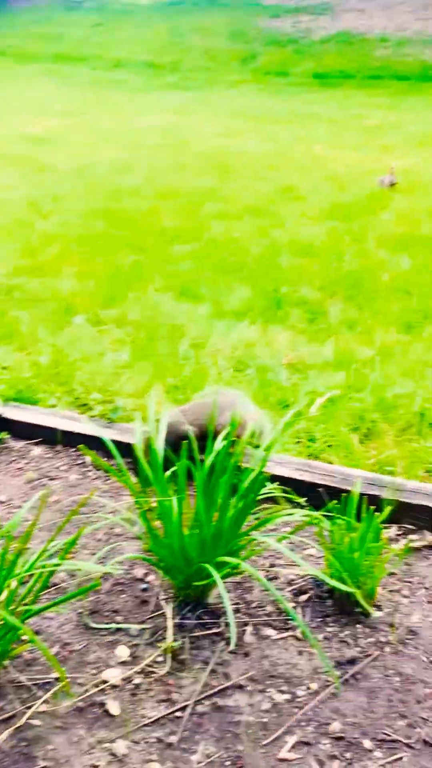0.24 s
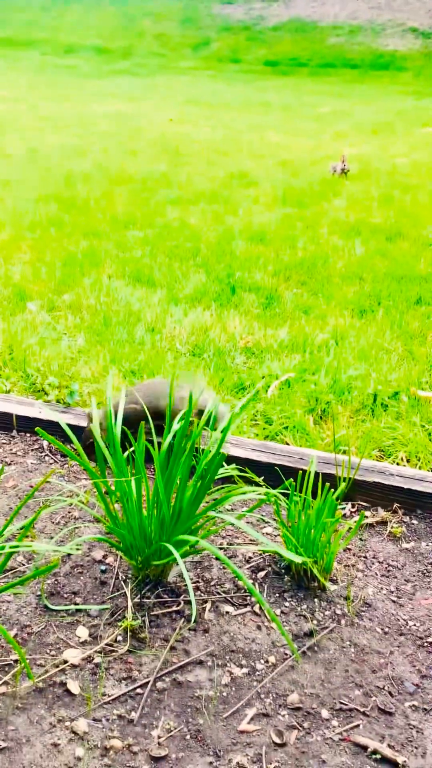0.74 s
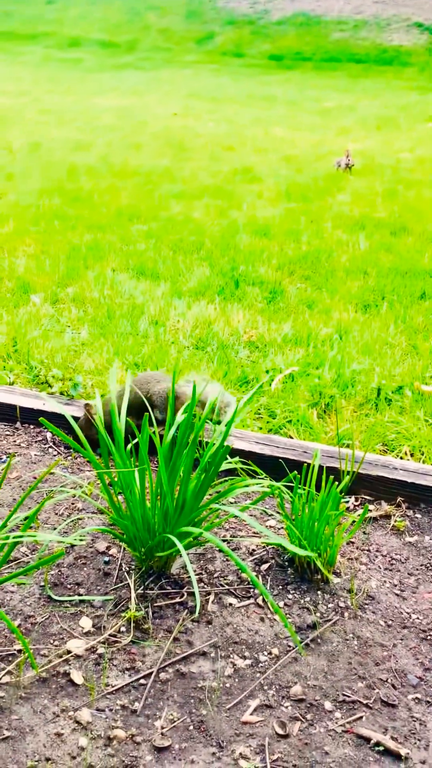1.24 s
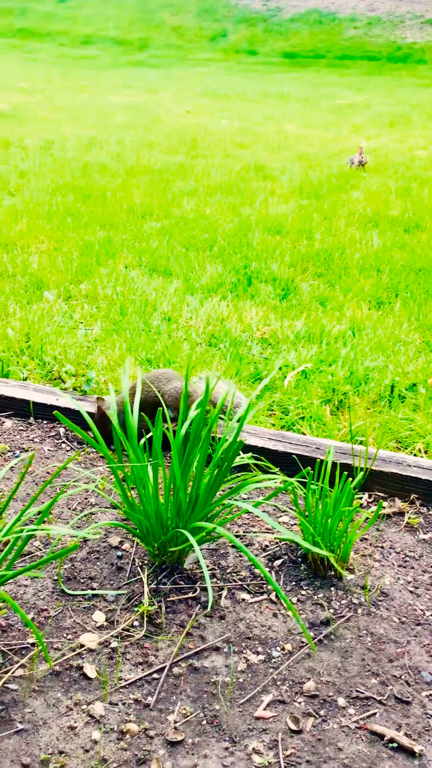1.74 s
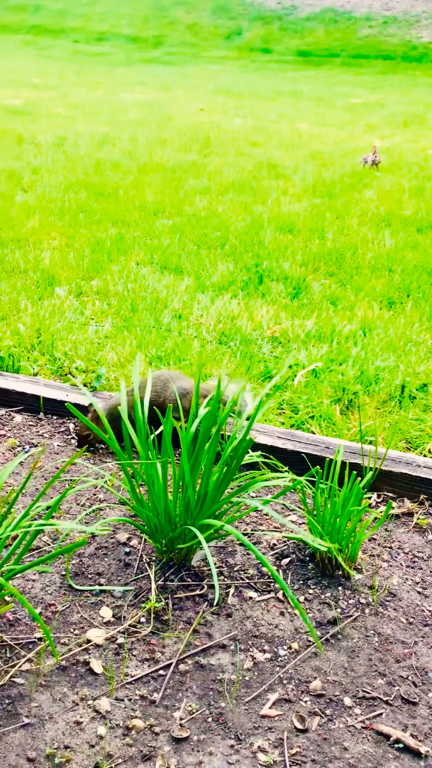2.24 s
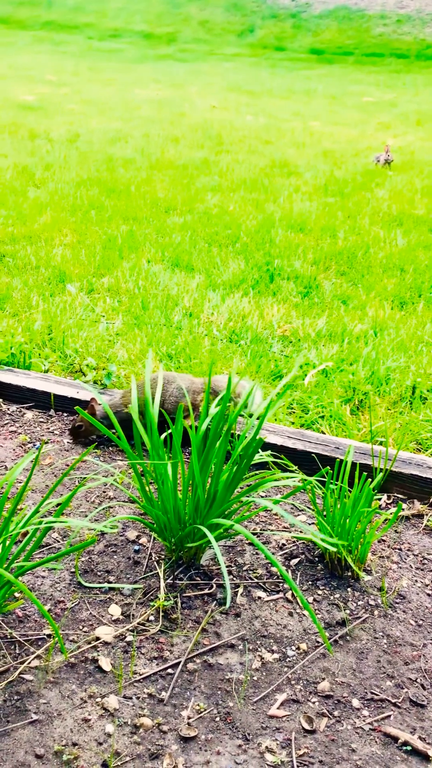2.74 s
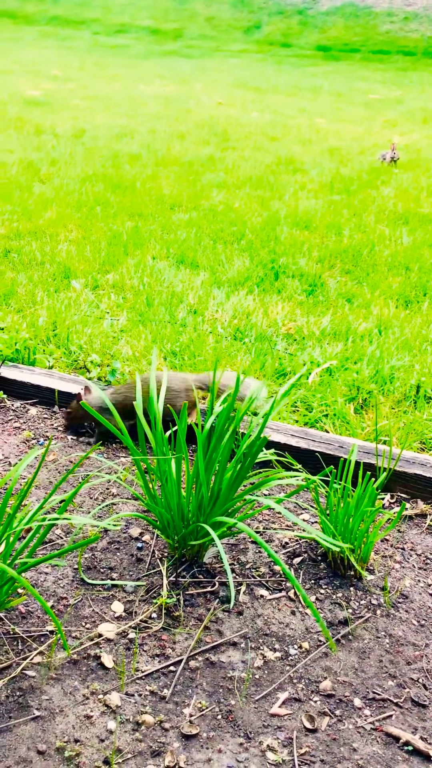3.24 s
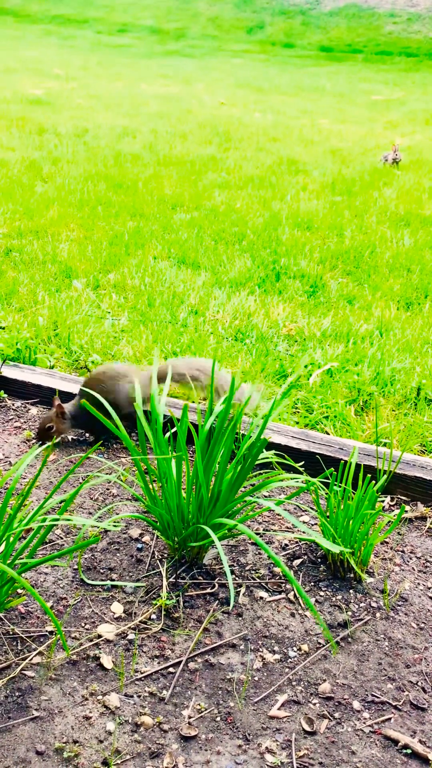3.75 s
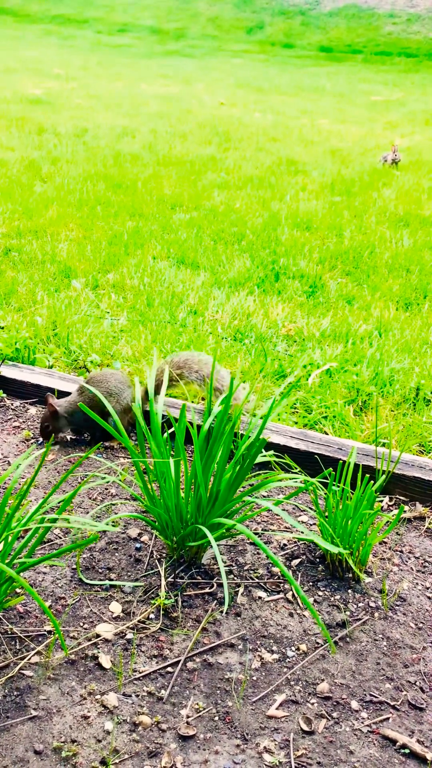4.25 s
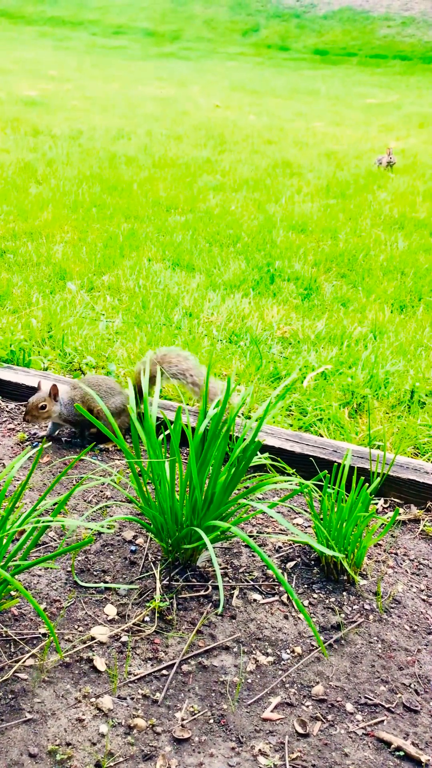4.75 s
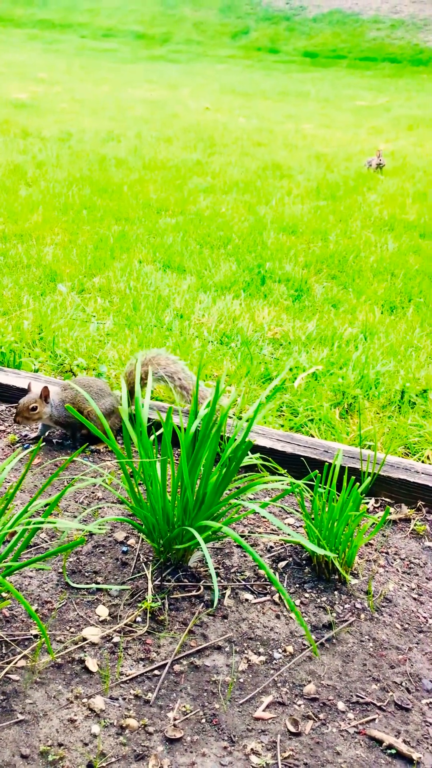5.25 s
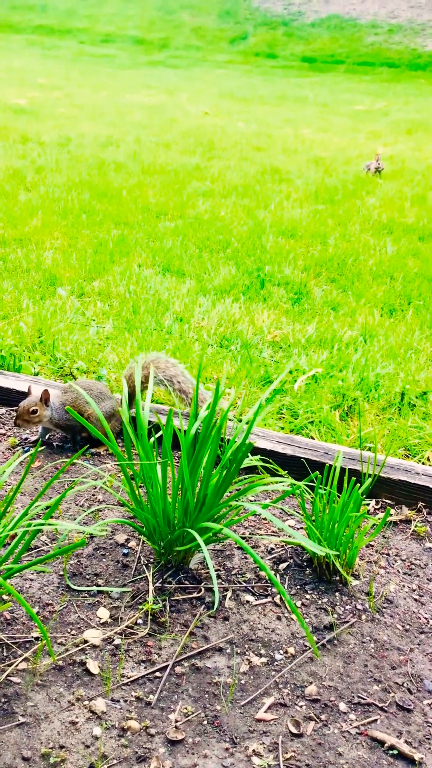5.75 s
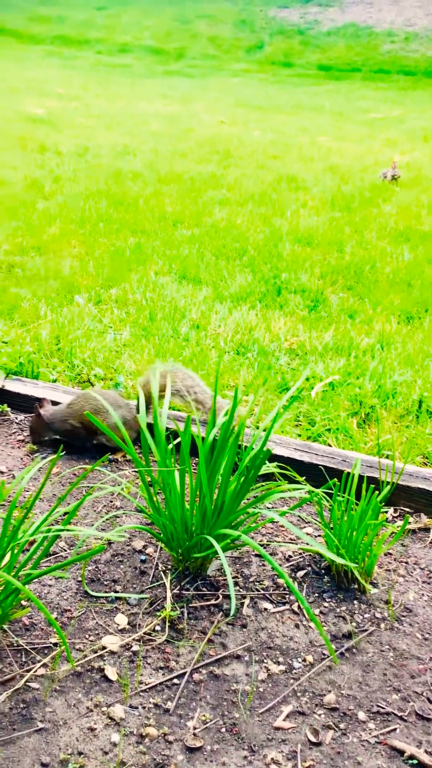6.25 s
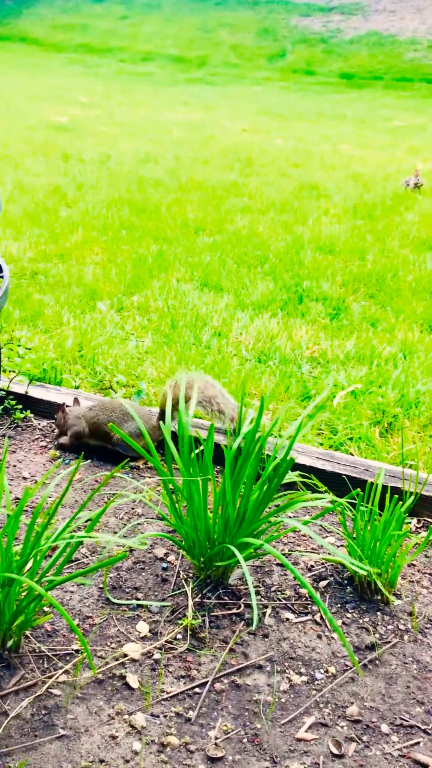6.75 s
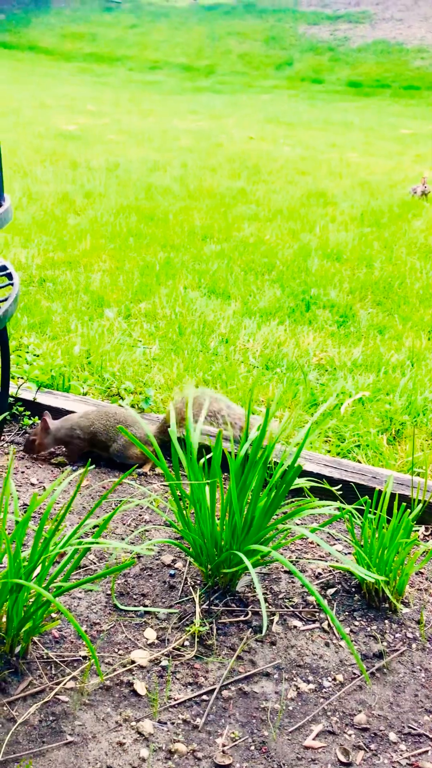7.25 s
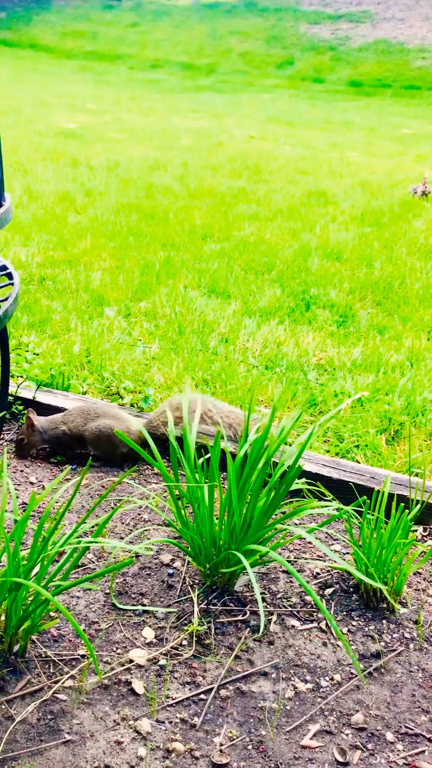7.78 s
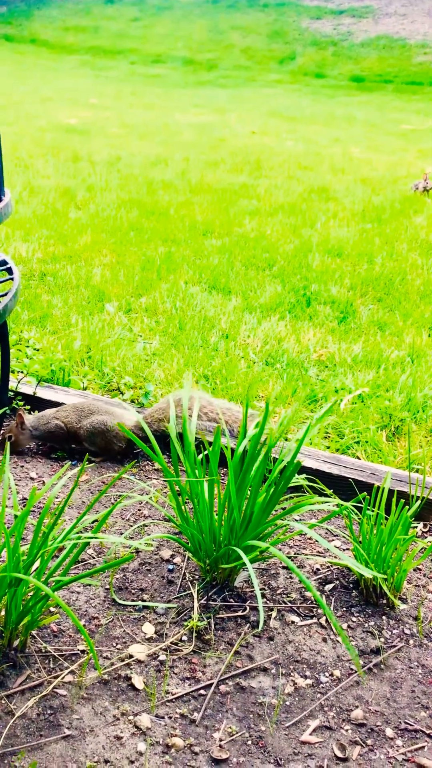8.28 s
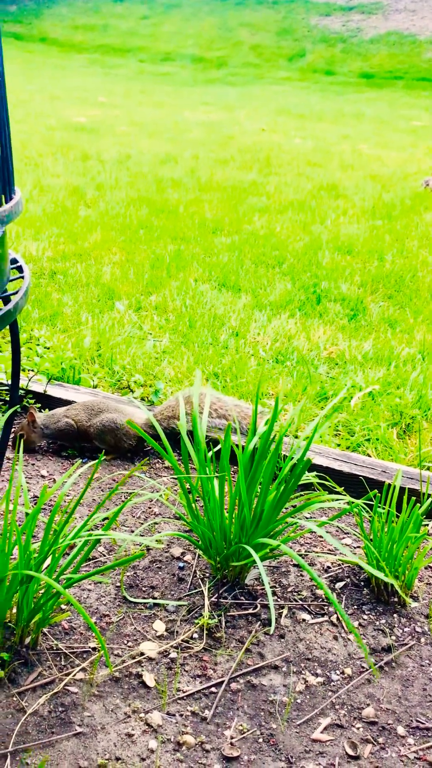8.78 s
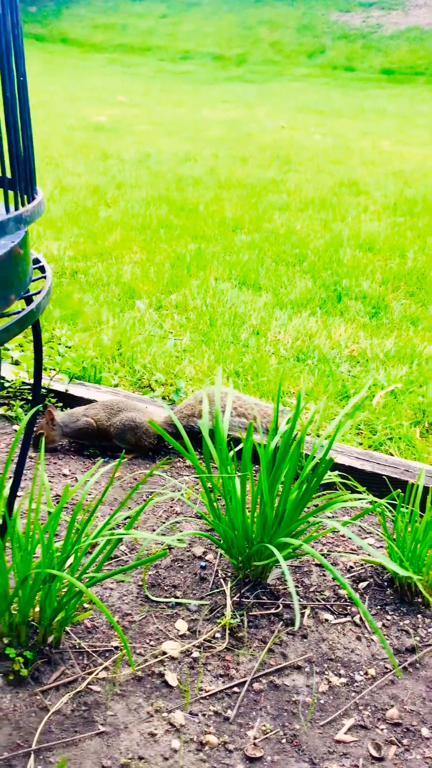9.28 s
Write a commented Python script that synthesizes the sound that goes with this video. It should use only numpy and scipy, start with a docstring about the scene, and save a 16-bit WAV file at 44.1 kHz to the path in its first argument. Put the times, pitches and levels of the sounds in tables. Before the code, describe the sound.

Harsh raspy squirrel growls swell and break into snarls and a screech, with short creaking barks and soft clicks, against a low far rumble.

```python
"""A rattling growl comes first: a grey squirrel on the ground in a back yard scolds, and its growls swell,
some to a snarl or screech as the mouth opens. Two stuttering barks slide down into a creak, with soft throat clicks.
Uneven vocal-fold pulses ring through throat resonances that follow the mouth; the clicks are single pulses.
The soil reflects the calls and the yard answers faintly. Far off, shaped noise makes the traffic and wavering
sines make thin whistles. The microphone is a phone's, with a band limit."""
import sys
import numpy as np
from scipy import signal
from scipy.fft import rfft, irfft, next_fast_len
from scipy.io import wavfile
from scipy.ndimage import map_coordinates

SR = 44100
rng = np.random.default_rng(int(sys.argv[2]) if len(sys.argv) > 2 else 0)


def generate_wav(signal):
    """Clip the signal to [-1, 1] and save it as 16-bit WAV at the path in sys.argv[1]."""
    frames = np.transpose(np.atleast_2d(signal))
    scaled = np.clip(frames, -1, 1) * 32767
    pcm = np.round(scaled).astype(np.int16)
    wavfile.write(sys.argv[1], SR, pcm)


N = 419832  # samples


def amp(db):
    """Decibels to gain."""
    return np.exp(np.asarray(db) * (np.log(10) / 20))


def unit(x):
    """x scaled to rms 1."""
    return x / np.sqrt(np.mean(x ** 2) + 1e-20)


def along(points, hz):
    """(frequency, value) points read on a log frequency axis."""
    f, v = np.transpose(points)
    return np.interp(np.log(hz + 1), np.log(f), v)


def wobble(rate):
    """A smooth random curve with rate knots a second."""
    knots = rng.standard_normal(int(N * rate / SR) + 4)
    coarse = np.arange(0, N, 32)
    return np.interp(np.arange(N), coarse, map_coordinates(knots, [coarse * rate / SR]))


def filtered(x, response):
    """x times a complex response of frequency."""
    size = next_fast_len(N + SR // 2)
    return irfft(rfft(x, size) * response(np.fft.rfftfreq(size, 1 / SR)), size)[:N]


def noise(spectrum):
    """Noise of rms 1 with the given colour."""
    return unit(filtered(rng.standard_normal(N), lambda hz: amp(along(spectrum, hz))))


def gate(start, end, rise_s, fall_s):
    """1 from start to end, with a straight rise before and a fall after."""
    return np.interp(np.arange(N) / SR, [start - rise_s, start, end, end + fall_s], [0, 1, 1, 0])


def arch(u):
    """0 in the middle of a gesture (u = .5), -1 at its ends and beyond."""
    return -(2 * np.clip(u, 0, 1) - 1) ** 2


def lagging(x, lag_s):
    """x followed sluggishly, with time constant lag_s."""
    keep = np.exp(-1 / (lag_s * SR))
    return signal.lfilter([1 - keep], [1, -keep], x)


# Throat resonances of the growls, from nearly shut to wide open:
# (centre before tension [Hz], width before tension [Hz], relative level [dB])
SHUT_THROAT = [(1040, 175, -8), (2044, 190, -2), (2285, 70, -7), (2936, 270, -6.5), (4340, 620, -14),
               (5310, 480, -20), (6460, 800, -24.5), (9000, 440, -32), (12190, 1950, -45.5)]
GROWL_THROAT = [(1137.4, 163, -2), (1950, 70, -1), (2120, 263, -1.5), (3080, 100, -5.5), (3167, 455, -8),
                (4540, 540, -13), (5420, 290, -16.5), (6415, 384, -19), (7810, 480, -26), (9280, 500, -29),
                (11300, 240, -36), (12830, 2010, -46)]
SNARL_THROAT = [(1120, 118, -6.5), (1310, 145, -3), (2310, 260, -0.5), (2610, 240, -3), (3770, 460, -3),
                (4640, 950, -10.5), (7000, 730, -16), (9350, 670, -22), (13750, 5620, -40.5)]
SCREECH_THROAT = [(710, 70, -22), (1260, 139, -5.5), (2470, 298, -1), (3490, 330, -5.5), (4370, 280, -2),
                  (5440, 450, -13), (6630, 330, -13), (7460, 470, -19), (9190, 860, -24.5),
                  (13120, 2990, -41.5)]
SQUEAL_HZ, SQUEAL_AT_DB, SQUEAL_HZ_PER_DB = 1105.8, -19, 19  # the open-mouthed pitch rises with effort
BODY_HZ = 1500  # a growl's body lies below this
SLACK, TIGHTEN_S = .08, .08  # the throat is slack when the mouth opens, and needs a moment to tighten


def growls():
    """Chaotic pulses: a sputter when soft, a rattle when driven, and a rough high pitch once the mouth opens."""
    level, mouth, body = effort()
    effort_db = 20 * np.log10(np.maximum(level, amp(-26)))
    squeal = SQUEAL_HZ + SQUEAL_HZ_PER_DB * (effort_db - SQUEAL_AT_DB)
    strain = np.clip(mouth - 1, 0, 1)
    drive = np.clip(level / amp(-33), .3, 1)
    unrest = wobble(110)
    # past a certain strain the folds jump from the slow rattle to the squeal
    rattle_hz = 500 * np.sqrt(drive) * np.exp(.08 * unrest)
    pitch = np.where(strain > .5, squeal * np.exp(.024 * unrest), rattle_hz)
    voice = folds(pitch, jitter=.225, scatter_db=1.5, rough=0.25)
    voice = voice + (body - 1) * filtered(voice, lambda hz: 1 / np.hypot(1, (hz / BODY_HZ) ** 10))
    # at low pressure the folds run only in short spurts
    spurts = np.sin(2 * np.pi * np.cumsum(82 * np.exp(.2 * unrest)) / SR)
    voice = voice * level * amp(-.5 + .25 * wobble(45) + 8 * (1 - drive) * (spurts - .5))
    # a straining throat tightens with the pitch
    slackness = SLACK * (1 - lagging(strain, TIGHTEN_S))
    tension = 1 + strain * (.6 * (squeal / SQUEAL_HZ - 1) - slackness)
    # the mouth opening crossfades one throat shape into the next
    growled = np.zeros(N)
    for k, modes in enumerate([SHUT_THROAT, GROWL_THROAT, SNARL_THROAT, SCREECH_THROAT]):
        share = np.sqrt(np.clip(1 - abs(mouth - k), 0, 1))
        growled = growled + throat(voice * share, modes, tension)
    return growled


# Growls that catch softly, swell and hold:
# (start [s], end [s], held effort [dB], softer at first by [dB], swell [s],
#  mouth opening [0 nearly shut, 1 growl], extra body [dB])
GROWL_GESTURES = [(.15, 1.65, -27.2, 14, .14, 1, .5), (2.535, 3.01, -30, 20, .15, 1, 2.5),
                  (6.128, 7.26, -26.7, 10, .26, 1, -.5), (7.774, 8.6, -29, 13, .3, 0.99, 0),
                  (8.639, 9.27, -29.5, 7, .2, 0, 0.016), (9.3, 9.7, -29.3, 8, .17, 0.0091, 0)]
# Surges that open the mouth during a growl:
# (start [s], end [s], top effort [dB], softer at both ends by [dB], mouth opening [2 snarl, 3 screech])
SCREAM_GESTURES = [(.29, .5, -19.6, 2.97, 1.996), (.51, .66, -19.3, 3.5, 2), (0.661, .745, -23, 1, 2),
                   (8.03, 8.61, -18.1, 1.95, 2.99)]
ATTACK_S, RELEASE_S = .018, .05  # of a growl
OPEN_S, CLOSE_S = .06, .03  # the mouth opens and closes


def effort():
    """Loudness, mouth opening and body: growls swell and hold, and screams surge above them."""
    t = np.arange(N) / SR
    level, mouth, body = np.zeros(N), np.zeros(N), np.zeros(N)
    for start, end, db, softer_db, swell_s, opening, body_db in GROWL_GESTURES:
        on = gate(start, end, ATTACK_S, RELEASE_S)
        still_soft = np.clip(1 - (t - start) / swell_s, 0, 1)
        level = np.maximum(level, on ** 2 * amp(db - softer_db * still_soft))
        mouth = np.maximum(mouth, opening * (on > 0))
        body = body + on * body_db
    for start, end, db, softer_db, opening in SCREAM_GESTURES:
        on = gate(start, end, OPEN_S, CLOSE_S)
        level = np.maximum(level, on * amp(db + softer_db * arch((t - start) / (end - start))))
        mouth = np.maximum(mouth, opening * np.sqrt(on))
    return level, np.clip(mouth, 0, 3), amp(body)


def folds(pitch, jitter, scatter_db, rough):
    """Uneven vocal-fold pulses of rms 1; a rough share is turbulence that follows each pulse."""
    cycles = np.cumsum(pitch) / SR
    chance = rng.standard_normal((int(cycles[-1]), 2))
    at = np.arange(len(chance)) + jitter * chance[:, 0]
    at = np.interp(at, cycles, np.arange(N)).astype(int)
    strength = amp(scatter_db * chance[:, 1]) / np.sqrt(pitch[at])
    pulses = unit(np.bincount(at, strength, N))
    flow = signal.lfilter([1], [1, -np.exp(-1 / (.0006 * SR))], pulses ** 2)
    turbulence = unit(np.sqrt(flow) * rng.standard_normal(N))
    rough = np.clip(rough, 0, 1)
    return np.sqrt(1 - rough) * pulses + np.sqrt(rough) * turbulence


# The small mouth radiates little bass: (frequency before tension [Hz], relative level [dB])
MOUTH_RADIATION = [(200, -13), (520, -3), (750, -2.5), (950, 1.5), (1150, -1), (1600, 0.5), (2000, 0),
                   (3300, .5)]


def throat(x, modes, tension=1):
    """The throat's resonances colour x; tension raises them all by that factor."""
    hop, size = 256, 1024
    f = np.fft.rfftfreq(size, 1 / SR)
    power = sum(amp(db) ** 2 / (1 + ((f - hz) / width) ** 2) ** 2 for hz, width, db in modes)
    magnitude = unit(np.sqrt(power) * amp(along(MOUTH_RADIATION, f)))
    # minimum phase: rings only after each pulse
    cepstrum = irfft(np.log(magnitude + 1e-6))
    cepstrum[1:size // 2] *= 2
    response = np.exp(rfft(cepstrum[:size // 2], size))
    # filter each sounding block with its own tension, then overlap and add
    blocks = np.pad(x, (0, -N % hop)).reshape(-1, hop)
    sounding = np.flatnonzero(abs(blocks).max(axis=1) > 1e-7)
    stretch = np.broadcast_to(tension, N)[hop * sounding, None]
    rings = irfft(rfft(blocks[sounding], size) * np.interp(f / stretch, f, response))
    places = hop * sounding[:, None] + np.arange(size)
    return np.bincount(places.ravel(), rings.ravel(), N)[:N]


# Barks, a stutter and then a falling voice, before the bark trim in scene():
# (start [s], bursts [count], burst drive [dB], voice drive [dB])
BARK_GESTURES = [(1.637, 5, -11.5, -16.5), (4.517, 4, -14, -16)]
# Throat resonances of each bark: (centre before tension [Hz], width before tension [Hz], relative level [dB])
FIRST_BARK_THROAT = [(1060, 120, -10), (1370, 270, -9.5), (2370, 340, -2.5), (2940, 100, -4.5),
                     (3785, 470, -3), (4940, 120, -9), (5550, 230, -10), (6570, 1150, -19.5),
                     (9320, 650, -27), (13120, 3750, -44.5)]
SECOND_BARK_THROAT = [(1138, 320, -12), (1400, 110, -4.5), (2420, 240, 0.5), (3730, 268, -1),
                      (4550, 290, -7.5), (5530, 210, -9.5), (6800, 600, -18.5), (7870, 350, -21.5),
                      (9240, 590, -27.5), (13120, 3750, -42)]


def barks():
    """Two barks, each resonating in its own throat shape."""
    return sum(bark(start, round(count), burst_db, voice_db, modes)
               for (start, count, burst_db, voice_db), modes
               in zip(BARK_GESTURES, [FIRST_BARK_THROAT, SECOND_BARK_THROAT]))


SLIDE_RISE_S, SLIDE_S, SLIDE_RELEASE_S = .016, 0.098, .035
SLIDE_HZ, SLIDE_FALL_S = 702, .085  # pitch as the stutter ends, and the time constant of its fall
SLIDE_FADE_DB_PER_S = 174.5
# slack folds close softly: (frequency [Hz], gain [dB])
SLACK_FOLDS = [(1000, 0), (1400, 3.5), (2400, -1.5), (3700, -2.5), (9000, -3)]


def bark(start, count, burst_db, voice_db, modes):
    """A stutter, then the pressure runs out: the pitch falls from a squeal to a slow creak."""
    onset = start + count / STUTTER_HZ
    t = np.clip(np.arange(N) / SR - onset, -SLIDE_RISE_S, SLIDE_S + SLIDE_RELEASE_S)
    on = gate(onset, onset + SLIDE_S, SLIDE_RISE_S, SLIDE_RELEASE_S)
    level = on ** 2 * amp(voice_db - SLIDE_FADE_DB_PER_S * t)
    pitch = SLIDE_HZ * np.exp(-t / SLIDE_FALL_S + .01 * wobble(150))
    slide = level * folds(pitch, jitter=0.017, scatter_db=1.9, rough=.22)
    slide = filtered(slide, lambda hz: amp(along(SLACK_FOLDS, hz)))
    tension = (pitch / 650) ** .055  # the throat slackens as the pitch falls
    # the fundamental passes through the neck
    fundamental = amp(-22) * level * np.sin(2 * np.pi * np.cumsum(pitch) / SR)
    return fundamental + throat(amp(burst_db) * stutter(start, count) + slide, modes, tension)


# bursts a second, the length of one, and how far the middle ones can stand out
STUTTER_HZ, BURST_S, STUTTER_ARCH_DB = 58.87, 0.0073, 7


def stutter(start, count):
    """The folds snap open at a steady rate, each time for a harsh burst."""
    t = np.arange(N) / SR - start
    shape = [-.0015, .001, BURST_S * 0.53, BURST_S + .001, BURST_S + 0.0099], [0, 0.92, 1, .3, 0]
    push = np.zeros(N)
    for k in range(count):
        strength = amp(STUTTER_ARCH_DB * arch((k + .5) / count))
        push = push + strength * np.interp(t - k / STUTTER_HZ, *shape)
    return push * folds(np.full(N, 1100.), jitter=.25, scatter_db=1.5, rough=.45)


# Single throat clicks: (time [s], strength before a 9.5 dB lift and the throat [dB])
CLICK_PULSES = [(4.9118, -37.5), (5.0739, -45), (5.084, -45), (5.1388, -41), (5.3023, -49), (6.0122, -48),
                (6.044, -45), (6.0595, -39), (6.082, -34), (6.096, -31)]


def clicks():
    """Lone, soft pulses ring in the growling throat, with the treble dulled."""
    pulses = np.zeros(N)
    for s, db in CLICK_PULSES:
        pulses[round(s * SR)] = amp(db + 9.5)
    return filtered(throat(pulses, GROWL_THROAT), lambda hz: amp(along([(3000, 0.5), (12000, -8)], hz)))


# How long the yard rings: (frequency [Hz], time to fall 60 dB [s])
YARD_DECAY = [(300, .6), (2000, .75), (5000, 0.65), (12000, .35)]


def yard(x, soil_s, soil_db, scatter_db, tail_db):
    """A bounce off the soil, scatter from nearby things, and a faint tail from the houses."""
    t = np.arange(SR) / SR
    hz, when, z = signal.stft(rng.standard_normal(SR), SR, nperseg=256)
    decay = amp(-60 * when / along(YARD_DECAY, hz)[:, None])
    tail = signal.istft(z * decay, SR, nperseg=256)[1][:SR]
    near = rng.standard_normal(SR) * amp(-60 * t / 0.052) * (t > .002)
    answer = amp(tail_db) * tail / np.linalg.norm(tail) + amp(scatter_db) * near / np.linalg.norm(near)
    bounce = filtered(x, lambda f: amp(soil_db) * np.exp(-2j * np.pi * f * soil_s))
    return x + bounce + signal.oaconvolve(x, answer)[:N]


# Loudness of the distant rumble: (time [s], level before a 0.75 dB lift and random wobble [dB])
TRAFFIC_LEVEL = [(0.0, -41.5), (0.74, -44.5), (3.74, -40.5), (5.7, -42.5), (7.77, -42), (8.38, -45),
                 (9.52, -43)]
# Colours of the rumble and of the wash: (frequency [Hz], relative level per Hz [dB])
RUMBLE_COLOUR = [(20, -62.5), (30, -39), (42, -18), (65, -3), (100, -1.5), (120, 1), (160, -6.5),
                 (205, -6.5), (255, -15.5), (340, -19), (480, -31.5), (900, -70)]
AIR_COLOUR = [(150, -15), (420, -5.5), (550, -2.5), (750, 0), (1050, -7.5), (1900, -19), (3700, -29),
              (5500, -37.5), (9000, -45.5), (15500, -53)]


def background():
    """Distant traffic: coloured noise makes a restless rumble under a soft, even wash."""
    level_db = np.interp(np.arange(N) / SR, *np.transpose(TRAFFIC_LEVEL))
    rumble = noise(RUMBLE_COLOUR) * amp(level_db + 0.75 + 0.79 * wobble(12))
    return rumble + noise(AIR_COLOUR) * amp(-55 + 0.66 * wobble(2))


# Faint far whistles: (start [s], end [s], mean pitch [Hz], peak level [dB])
FAR_WHISTLES = [(3.2, 3.55, 3800, -76), (3.85, 4.5, 1825, -73), (4.15, 4.5, 3770, -81)]


def whistles():
    """Thin sine tones from far away that waver together in pitch."""
    t = np.arange(N) / SR
    waver = 1 + .002 * wobble(22)
    phase = 2 * np.pi * np.cumsum(waver) / SR
    tones = np.zeros(N)
    for start, end, hz, db in FAR_WHISTLES:
        fade = np.interp(t, [start, start + 0.053, end - .08, end], [0, 1, 1, 0])
        tones = tones + amp(db) * fade * np.sin(hz * phase)
    return tones


def scene():
    """The squirrel in its yard, with traffic and whistles far behind it."""
    squirrel = growls() + amp(-0.57) * barks() + clicks()
    # the soil bounce travels about 0.9 m farther than the direct call
    in_yard = yard(squirrel, soil_s=.00263, soil_db=-15.5, scatter_db=-7, tail_db=-27.5)
    return (in_yard + background() + whistles())[None]


TOP_HZ = 15750  # the phone's band limit


def record(dry):
    """The phone keeps nothing above its band limit."""
    return filtered(dry[0], lambda hz: hz < TOP_HZ)[None]


dry = scene()
out = record(dry)
generate_wav(out)
```